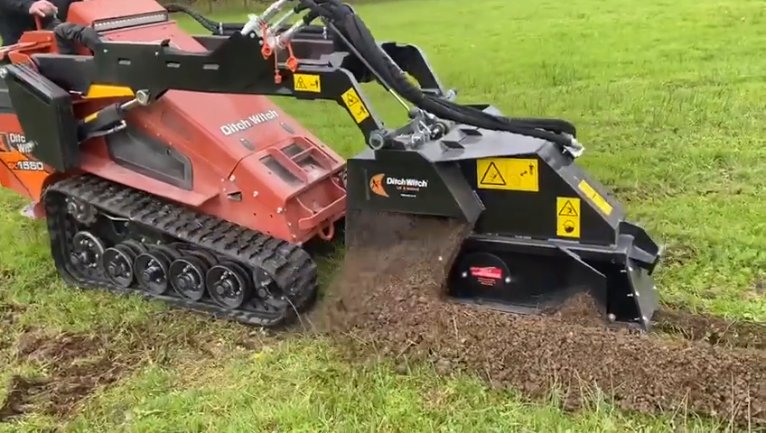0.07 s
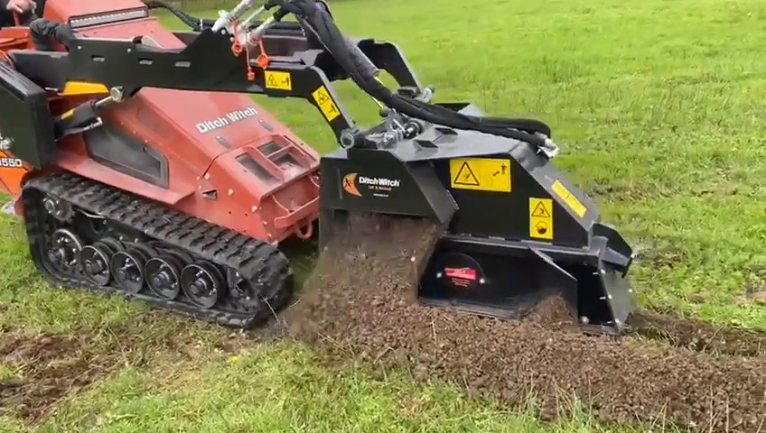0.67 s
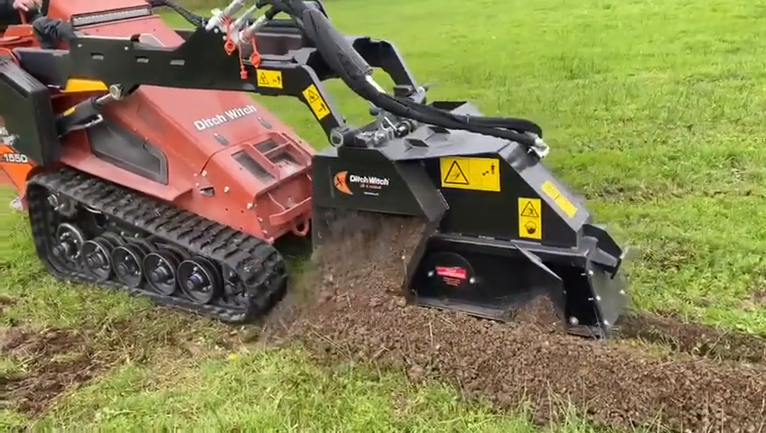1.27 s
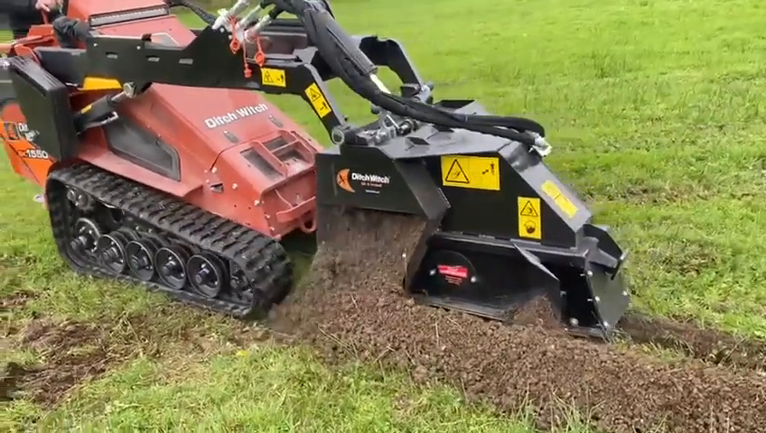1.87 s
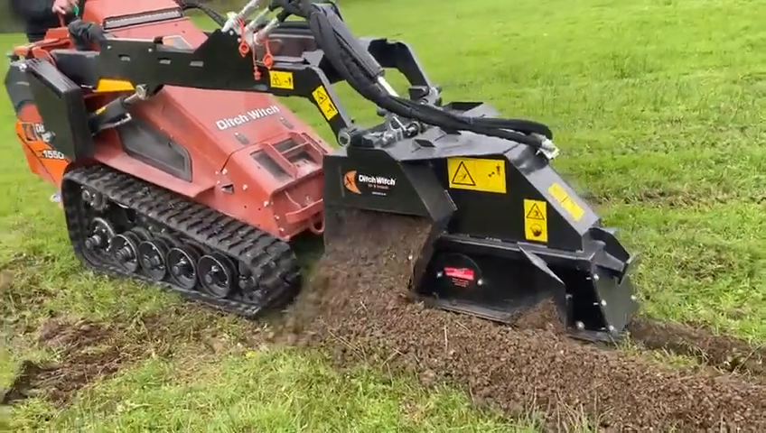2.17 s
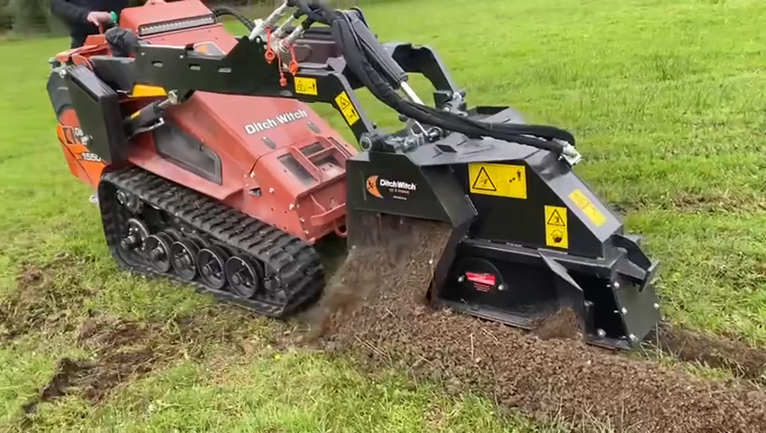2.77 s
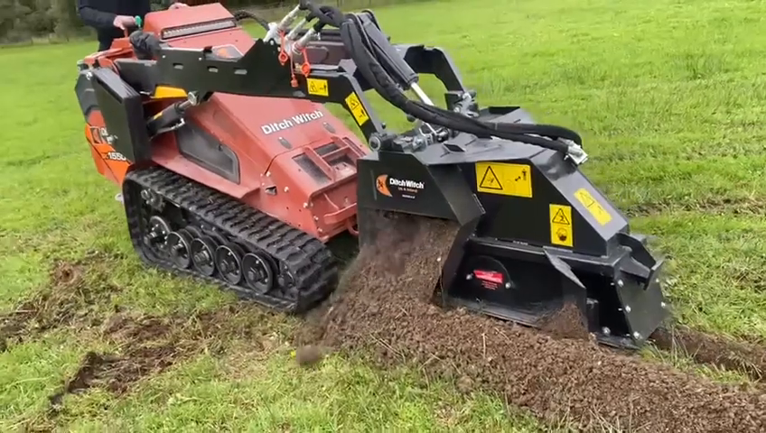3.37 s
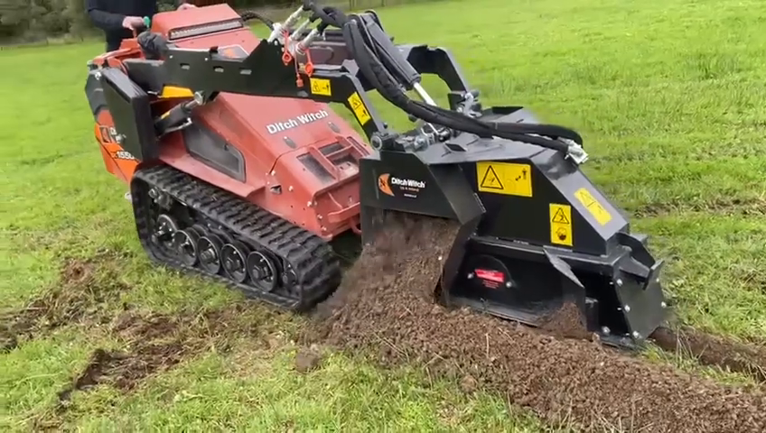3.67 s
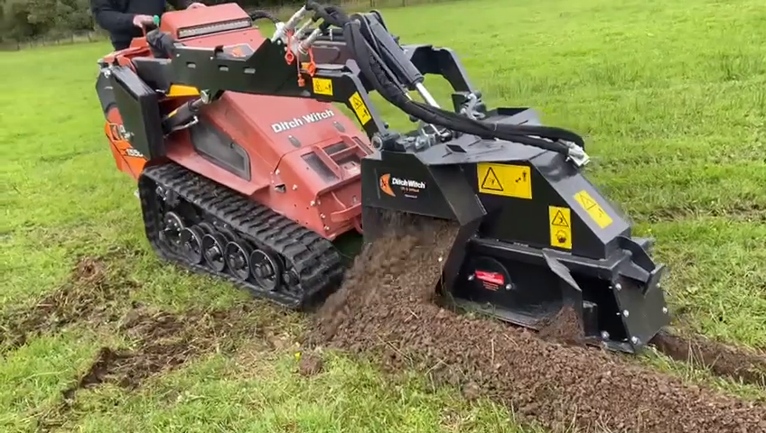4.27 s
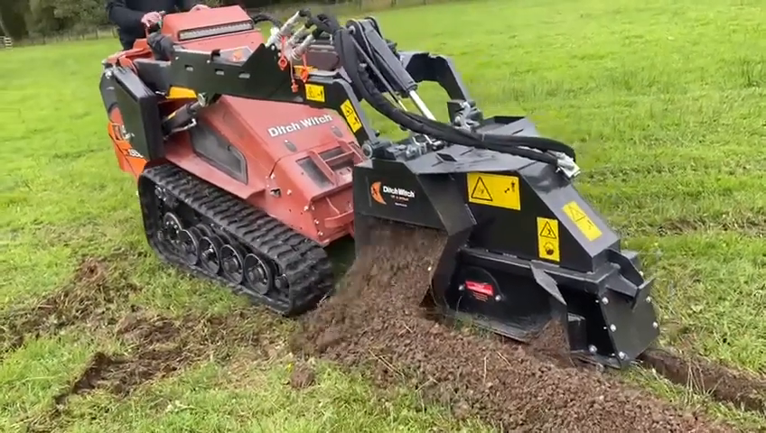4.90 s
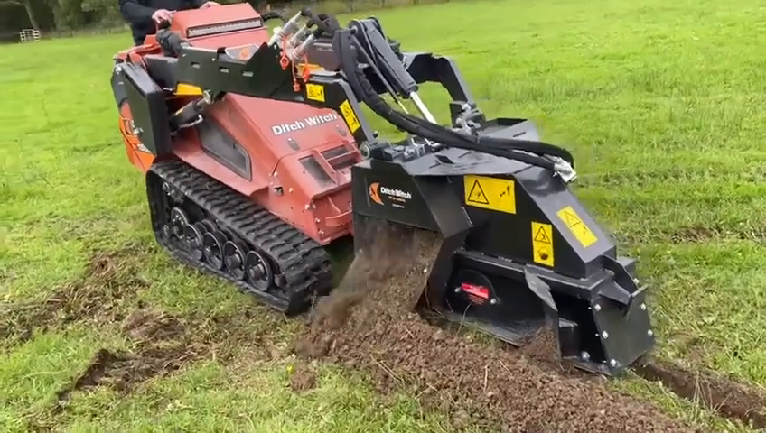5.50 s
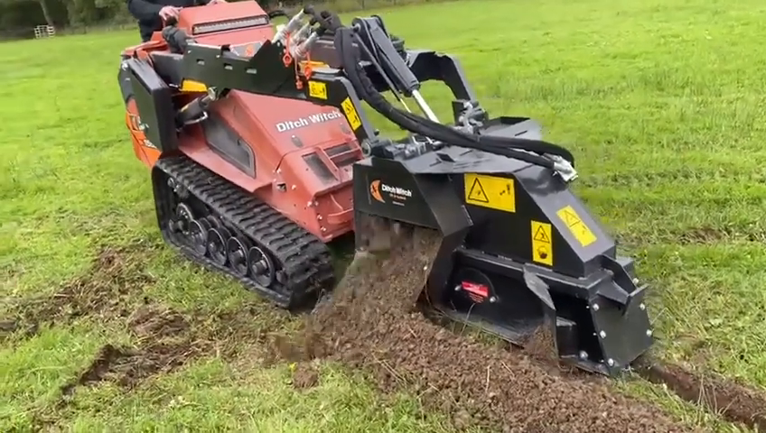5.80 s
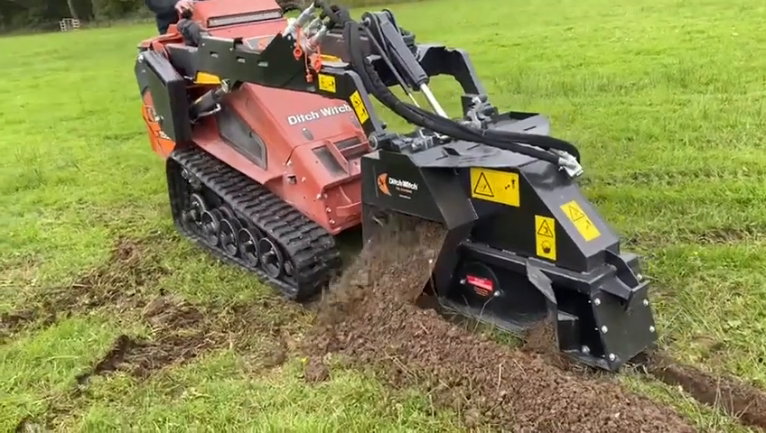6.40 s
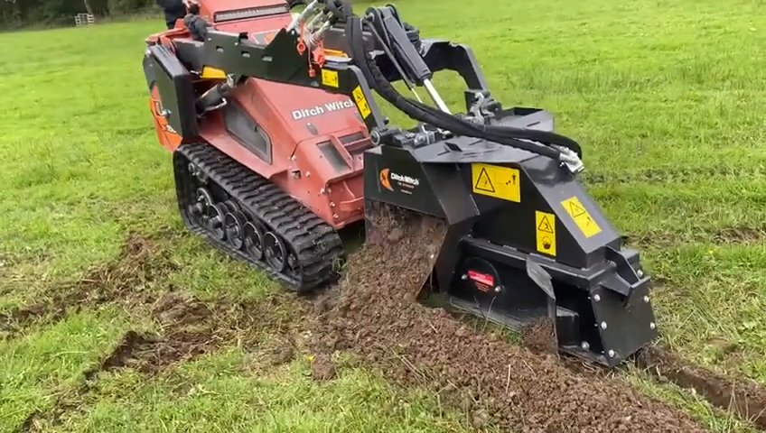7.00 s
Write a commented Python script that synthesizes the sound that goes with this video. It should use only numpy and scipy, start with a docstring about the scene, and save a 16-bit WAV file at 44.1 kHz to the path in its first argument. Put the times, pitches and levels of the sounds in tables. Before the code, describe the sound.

A small tracked diesel loader cuts a trench through turf, heard outdoors from a few metres away. It runs for the whole seven seconds: a strong, low fan hum on top of engine clatter, with a wavering mid-pitched hydraulic whine and a light oil hiss that gradually recedes. Underneath, the toothed wheel rumbles and churns earth, with a gritty spray of soil and a soft jingle of grit on steel. From the start, stones crack, knock and clank irregularly in the steel hood, several times a second, bunching a little near 3 seconds and easing around 4 to 4.7. From about 5 seconds the ground turns stonier and the rattle grows thicker and louder, with the heaviest knocks near 5.7 and 6.7 seconds. Meanwhile the engine hum sinks slightly in pitch and the hydraulic whine drops and strengthens under the strain, still running at the end.

```python
"""A small tracked diesel loader cuts a trench through turf, a few metres away.
The hum of its cooling fan sits on top of engine clatter and a hydraulic whine. The toothed wheel
rumbles underneath, churning earth and flinging soil and stones that crack, boom and clank in its
steel hood. After five seconds the ground turns stonier: the rattle thickens and the engine sags."""
import sys
import numpy as np
from scipy import signal
from scipy.fft import rfft, irfft
from scipy.io import wavfile
from scipy.ndimage import uniform_filter1d, map_coordinates

SR = 44100
rng = np.random.default_rng(int(sys.argv[2]) if len(sys.argv) > 2 else 0)


def file_out(sig):
    """Save sig as 16-bit WAV at sys.argv[1]."""
    # one column per channel
    cols = np.atleast_2d(sig).T
    # limit, then scale
    lim = np.clip(cols, -1, 1)
    pcm = np.round(lim * 32767).astype(np.int16)
    wavfile.write(sys.argv[1], SR, pcm)


N = 319725
T = np.arange(N) / SR
BINS = np.maximum(np.arange(N // 2 + 1) * SR / N, 1)

# fader ride on the fan's octave: time_s, level_db
FAN_OCTAVE_RIDE = [(0, -30.5), (.35, -28.5), (1.1, -31), (1.6, -31), (2, -32.5), (2.9, -31), (3.6, -34.5),
                   (5.2, -34), (7.25, -34)]
# fan overtones above the octave, engine running free: blade_rate_multiple, level_db
FAN_OVERTONES = [(3, -38), (4, -35.2)]
# fader ride on the thin whine high above the hum: time_s, level_db
FAN_WHINE_RIDE = [(0, -57), (.8, -53), (1.35, -44.5), (1.9, -47), (2.5, -48), (3, -52), (3.5, -50),
                  (4, -57), (4.7, -50), (5.3, -49), (5.8, -57), (7.25, -58)]
# tone colour of the engine block: frequency_hz, gain_db
BLOCK_EQ = [(60, -33), (220, 6.5), (500, -3), (700, 12.5), (1200, 4), (1850, 6.5), (2400, -11), (3000, -10),
            (4700, -4), (5700, -6), (7400, -11), (10800, -19), (12000, -26)]
# strong engine tones: crank_rate_multiple, level_db
ENGINE_ORDERS = [(2, -37), (3, -36.5), (12, -42.5), (22, -48), (25, -46), (28.5, -47), (37, -47),
                 (46.5, -52), (60, -57.5)]
# whine of the hydraulic motor: time_s, pitch_hz
MOTOR_PITCH = [(0, 617), (1.0, 621), (1.4, 648), (1.9, 648), (2.6, 632), (4.2, 612), (5.05, 611),
               (6.25, 581), (7.25, 556)]
# bands of oil hiss in the valves: centre_hz, width_hz, gain_db
VALVE_BANDS = [(3100, 300, -2), (4200, 450, 0), (4850, 300, -2), (6600, 350, -3), (7400, 350, -3),
               (10700, 700, -6)]
# how hard the wheel is pushed into the earth: time_s, feed_0_to_1
WHEEL_FEED = [(0, .35), (.6, .25), (1.3, .76), (1.8, .65), (2.3, .1), (2.8, .98), (3.2, .7), (3.55, .3),
              (4.7, 0), (5.05, .3), (5.35, .85), (6.7, .7), (7.25, .15)]
# how stony the ground is: time_s, stoniness_0_to_1
STONINESS = [(0, 0.14), (1.1, 0.24), (2.3, 0.34), (2.8, 0.5), (3.4, 0.23), (4.7, 0), (5.2, .6), (5.75, 1),
             (6.15, .63), (6.7, 0.47), (7.25, 0.18)]
# low resonances of wheel and frame: pitch_hz, width_hz, gain_db
FRAME_MODES = [(80.4, 6.6, 0), (96, 25, -5), (142.7, 11.5, -7.5), (176.2, 27, -4.5)]
# tone colour of churned earth: frequency_hz, gain_db
CHURN_EQ = [(20, -21), (45, -15), (110, -7.5), (230, 0), (330, -2.5), (480, -4), (540, -4.5), (630, -1.5),
            (740, -4), (1000, -9.5), (1500, -11), (2200, -17), (3000, -19), (8000, -39)]
# resonances of the steel hood: pitch_hz, width_hz, gain_db
HOOD_MODES = [(710, 170, -5.5), (940, 140, -3), (1157, 160, -4.5), (1540, 55, -12.5), (2080, 140, -13.5)]
# tone colour of the soil spray: frequency_hz, gain_db
SPRAY_EQ = [(400, -20), (1200, -1), (2200, 1.5), (2900, -1.5), (4000, 0.3), (4800, .3), (5600, -4),
            (7400, 0), (8200, -1.5), (10800, -2), (12000, -7)]
# ring of the steel teeth: pitch_hz, width_hz, gain_db
TOOTH_MODES = [(1570, 70, -2), (1760, 70, -1), (1880, 60, -2), (2340, 45, 1), (2490, 55, 0)]
# fader ride on the grit clinking on the teeth: time_s, level_db
CLINK_RIDE = [(0, -41.5), (.75, -43), (1.05, -49), (1.6, -43), (2.3, -44), (2.9, -41.5), (3.8, -39.5),
              (4.4, -44), (5.6, -41), (6.7, -40), (7.25, -38.5)]
# big stones hitting the hood, levels before the mix trims: start_s, crack_db, boom_db, plate_hz, clank_db
STONE_HITS = [(.020, -24, -31, 6100, -31), (.206, -20.5, -30, 7300, -25), (.264, -21.5, -34, 2200, -28),
              (.292, -24, -26, 2400, -26), (.707, -26, -25, 2400, -28), (.771, -26, -30, 2400, -28),
              (1.197, -23, -28, 7300, -27), (1.408, -24, -36, 7300, -28), (1.602, -23, -22, 4200, -30),
              (1.654, -22.5, -34, 2350, -25), (1.841, -22, -21, 7300, -29), (1.968, -26, -30, 2400, -29),
              (2.093, -25, -28, 2300, -24), (2.336, -22.5, -26, 2370, -23), (2.342, -28, -26, 3700, -27),
              (2.496, -25.5, -20, 1550, -25), (2.582, -22.5, -23, 7300, -29), (2.643, -25, -25, 4500, -27),
              (2.823, -23, -34, 2370, -20), (2.860, -26, -26, 2330, -20), (2.884, -21, -30, 7190, -26),
              (2.985, -27, -26, 3960, -26), (3.069, -26, -34, 4500, -27), (3.106, -25, -28, 2100, -21),
              (3.230, -27, -26, 2200, -25), (3.714, -26, -26, 2370, -26), (3.839, -28, -27, 2370, -24),
              (3.901, -22, -24, 2500, -27), (4.038, -22.5, -24, 4700, -29), (4.318, -31, -24, 2450, -27),
              (4.564, -25, -20.5, 2370, -24), (4.625, -29, -23, 2450, -26), (4.814, -23.5, -32, 5000, -28),
              (4.872, -21.5, -24, 5000, -26), (5.056, -23, -33, 2020, -21), (5.120, -16, -32, 6100, -22),
              (5.137, -25, -35, 2330, -22), (5.180, -25, -22, 2330, -21), (5.204, -21, -22, 4600, -27),
              (5.311, -21.5, -26, 4700, -28), (5.377, -18.5, -19, 2280, -21),
              (5.452, -23.5, -22, 2200, -22), (5.501, -21.5, -22, 2070, -20), (5.587, -26, -22, 1550, -25),
              (5.630, -18.5, -28, 3920, -23), (5.714, -27, -16.5, 800, -18), (5.738, -21.5, -16, 4570, -19),
              (5.746, -28, -24, 2200, -18), (5.770, -21, -15.5, 950, -16), (5.899, -22, -21, 2330, -20),
              (5.932, -19, -25, 6110, -25), (5.985, -21.5, -24, 2300, -23), (6.033, -20, -21, 3790, -21),
              (6.119, -21.5, -33, 2970, -18.5), (6.162, -18.5, -18.5, 2200, -22),
              (6.196, -21.5, -34, 2200, -19), (6.289, -20.5, -32, 4130, -21), (6.420, -25, -30, 2300, -26),
              (6.550, -19.5, -20, 2110, -17), (6.688, -17.5, -20.5, 4180, -22),
              (6.709, -15.5, -30, 7500, -22), (6.722, -18, -25, 4600, -16), (6.727, -26, -30, 2200, -16),
              (6.793, -25, -36, 2300, -24), (6.824, -23, -30, 7300, -27), (6.959, -30, -19, 2200, -25),
              (6.999, -23.5, -36, 2400, -24), (7.066, -22.5, -32, 4570, -28), (7.091, -20, -24, 2200, -21),
              (7.225, -24, -22, 2400, -26)]
# tone colour of stone knocks: frequency_hz, gain_db
KNOCK_EQ = [(500, -10), (1500, 0), (2300, 1.5), (3100, -2), (4300, -.5), (5800, -4.5), (7500, -4),
            (12000, -11)]
# ring of the wheel when a stone hits: pitch_hz, width_hz, gain_db
WHEEL_RING_MODES = [(1850, 70, 0), (2140, 60, 2), (2420, 60, 1), (4180, 110, -7), (4570, 80, -5),
                    (6080, 110, -7), (7280, 110, -6), (7720, 90, -7)]
# partials of a struck plate: pitch_ratio, gain_db
PLATE_PARTIALS = [(.66, -7), (.83, -4), (1, 0), (1.72, -7), (2.5, -12)]
# swelling oil whistles: peak_s, half_length_s, peak_db, faint_pitch_hz, rise_hz
OIL_WHISTLES = [(.23, .06, -51, 10830, 35), (.6, .05, -53, 10830, 35), (4.6, .3, -59, 4790, 60),
                (5.1, .4, -52.5, 4900, 140), (6.3, .22, -49, 3170, 110)]
# stereo image, 1 the same in both ears and -1 opposed: frequency_hz, correlation
EAR_LIKENESS = [(200, .985), (450, .95), (800, .9), (1400, .84), (2200, .56), (3200, .33), (4900, .72),
                (5400, .45), (6200, .92), (7500, .92), (8400, -.9), (9600, -.9), (10300, .92)]
# stereo balance: frequency_hz, left_minus_right_db
EAR_BALANCE = [(60, -0.5), (220, -1), (390, 0), (470, 4), (580, -7.5), (800, -3), (1000, -4.5), (1400, -2),
               (1800, -3.5), (2400, -1.5), (3000, 4.5), (4000, 1.2), (7000, 0.5)]

FREE_BLADE_HZ, BLADES_PER_CRANK_TURN = 196.7, 3.9375
BOG_S, SAG_HZ_PER_S = 5.23, 5.6  # when the engine bogs; how fast the fan's pitch sinks
SHIFT_S = 4.7  # over this time the balance shifts: the hum grows and the valve hiss falls back
# Each pair: base value, then the change once the balance has shifted or at full strain, feed or stoniness.
HUM_DB, HUM_SHIFT_DB = -21, 2
MOTOR_DB, MOTOR_STRAIN_DB = -43, 12.5
HISS_DB, HISS_SHIFT_DB = -43, -9
RUMBLE_DB, RUMBLE_FEED_DB = -29, 6
CHURN_DB, CHURN_STONY_DB = -27.5, 3.5
CLOD_DB, CLOD_STONY_DB = -10.5, 3  # relative to the churn
SPRAY_DB, SPRAY_STONY_DB = -44, 7
PEBBLES_PER_S, PEBBLES_STONY_PER_S = 10, 40
PEBBLE_DB, PEBBLE_STONY_DB = -35, 8.5  # before the mix trims


def undb(db):
    """Decibels to gain."""
    return 10 ** (np.asarray(db) / 20)


def unit(x):
    """Scale to rms 1."""
    return x / np.sqrt(np.mean(x ** 2))


def ride(points):
    """An automation lane: straight lines between (time_s, value) points."""
    return np.interp(T, *np.transpose(points))


def across(points):
    """Draw (frequency_hz, value) points across every frequency bin."""
    hz, value = np.transpose(points)
    return np.interp(np.log(BINS), np.log(hz), value)


def colour(x, eq):
    """Shape a sound with an EQ curve."""
    return irfft(rfft(x) * undb(across(eq)), N)


def resonate(x, modes):
    """Pass a sound through a bank of steep resonances."""
    power = 0
    for hz, width, db in modes:
        detune = (BINS ** 2 - hz ** 2) / (BINS * width * 2)
        power += undb(db) ** 2 / (1 + detune ** 2) ** 2
    return irfft(rfft(x) * np.sqrt(power), N)


def strike(blows, modes):
    """Blows ring decaying steel modes, each blow in a different mix; two channels."""
    age = T[:SR // 10]
    out = np.zeros((2, N))
    for hz, width, db in modes:
        mode = undb(db) * np.sqrt(width) * np.sin(2 * np.pi * hz * age) * np.exp(-np.pi * width * age)
        out += signal.fftconvolve(blows * rng.uniform(-.93, 1, (2, N)), mode[None], axes=1)[:, :N]
    return out


def drift(rate_hz):
    """Smooth random modulation of rms 1, moving at up to about rate_hz."""
    return unit(irfft(rfft(rng.standard_normal(N)) / (1 + (BINS / rate_hz) ** 4), N))


def turns(hz):
    """Cycles completed at a changing rate."""
    return np.cumsum(hz) / SR


def tone(cycles):
    """A sine of rms 1 that starts anywhere in its cycle."""
    return np.sqrt(2) * np.sin(2 * np.pi * (cycles + rng.random()))


def spread(pair):
    """Two unrelated signals become left and right, nearly mono in the bass."""
    likeness = np.clip(across(EAR_LIKENESS), -1, 1)
    mid, side = rfft(pair) * np.sqrt([1 + likeness, 1 - likeness])
    return irfft(np.array([mid + side, mid - side]), N)


def grains(per_s, scatter_db):
    """Tiny random impacts of scattered size; two channels."""
    size = undb(scatter_db * np.clip(rng.standard_normal(N), -2, 2))
    struck = rng.random(N) < per_s / SR
    return size * struck * rng.standard_normal((2, N))


def fan(blade_hz, load, shifted):
    """Blades chop the air: a strong hum whose overtones waver with the inflow and fade as it slows."""
    blade = turns(blade_hz)
    hum = undb(HUM_DB + HUM_SHIFT_DB * shifted + .19 * drift(6.6)) * tone(blade + .0038 * drift(11))
    octave = undb(ride(FAN_OCTAVE_RIDE) + .7 * drift(7)) * tone(2 * blade + .012 * drift(7))
    upper = sum(undb(db + 1.9 * drift(7)) * tone(k * blade + .04 * drift(6)) for k, db in FAN_OVERTONES)
    ear_cycles = np.array([[-.15], [.15]])  # the thin whine reaches the left ear later
    whine = undb(ride(FAN_WHINE_RIDE) + 1.8 * drift(7)) * tone(16 * blade + .1 * drift(6) + ear_cycles)
    return hum + octave + undb(-6 * load) * upper + whine


def engine(crank_hz):
    """Four-cylinder diesel: the same clatter comes round every two turns, swelling at each firing."""
    crank = turns(crank_hz)
    loop = rng.standard_normal((2, 1764))
    playhead = (crank / 2 % 1) * loop.shape[1] + 1.3 * drift(30)
    clatter = np.array([map_coordinates(side, [playhead], order=3, mode="grid-wrap") for side in loop])
    firing = 1 + .15 * np.exp(-(2 * crank % 1) / .86)
    block = unit(colour(spread(clatter * firing * undb(2.44 * drift(22))), BLOCK_EQ))
    drone = sum(undb(db + 1.75 * drift(3.5)) * tone(k * crank + .098 * drift(1.87))
                for k, db in ENGINE_ORDERS)
    return undb(-33.5) * block + drone


def pump(crank_hz, load):
    """The nine-piston pump sings at twice its piston rate, louder under load."""
    return undb(-41.5 + 6.5 * load + 1.8 * drift(6)) * tone(18 * turns(crank_hz))


def hydraulic_motor(free_hz=652.3, full_strain_drop_hz=45.7, shake_db=4.5, shake_hz=9):
    """The motor's whine drops, grows and steadies as it is held back and oil pressure builds."""
    pitch_hz = ride(MOTOR_PITCH)
    strain = np.clip((free_hz - pitch_hz) / full_strain_drop_hz, 0, 1)
    shake = 1 - .62 * strain
    level_db = MOTOR_DB + MOTOR_STRAIN_DB * strain + shake_db * shake * drift(28) + drift(2)
    return undb(level_db) * tone(turns(pitch_hz + shake_hz * shake * drift(25)))


def valve_hiss(shifted):
    """Oil hisses through the valves, falling back in the mix as the balance shifts."""
    hiss = unit(resonate(spread(rng.standard_normal((2, N))), VALVE_BANDS))
    return undb(HISS_DB + HISS_SHIFT_DB * shifted ** 2) * hiss


def cutter_wheel(crank_hz, stony):
    """Over the frame's rumble, teeth bite about thirty times a second, throwing crumbs and clods."""
    tooth = turns(crank_hz * .61)
    # some of the eight teeth dig deeper on every turn; each bite also differs by chance
    depth_db = 1.3 * np.resize(rng.standard_normal(8), 512)
    depth_db += 2.5 * np.clip(rng.standard_normal(512), -2, 1.2)
    bite = undb(depth_db[tooth.astype(int)]) * np.exp(-(tooth % 1) / .5)
    bite = uniform_filter1d(bite, size=260)  # soft earth gives way over some milliseconds
    rumble = unit(resonate(spread(rng.standard_normal((2, N))), FRAME_MODES))
    churn = unit(colour(spread(grains(8000, 1.8) * (1 + .052 * bite)), CHURN_EQ))
    clods = unit(resonate(spread(grains(1100, 1) * (.8 + bite)), HOOD_MODES))
    spray = unit(colour(spread(grains(12000, 2) * (1 + 1.7 * bite)), SPRAY_EQ))
    earth = churn + undb(CLOD_DB + CLOD_STONY_DB * stony) * clods
    return (undb(RUMBLE_DB + RUMBLE_FEED_DB * ride(WHEEL_FEED)) * rumble
            + undb(CHURN_DB + CHURN_STONY_DB * stony) * earth
            + undb(SPRAY_DB + SPRAY_STONY_DB * stony) * spray)


def grit_clinks(per_s=60):
    """Grit strikes the steel teeth so often that the rings merge into a soft jingle."""
    blows = rng.random(N) < per_s / SR
    return undb(ride(CLINK_RIDE)) * unit(spread(strike(blows, TOOTH_MODES)))


def pebble_hits(stony, centre_hz=2275):
    """Pebbles land at random, more and harder in stony ground: rows like those of STONE_HITS."""
    struck = rng.random(N) < (PEBBLES_PER_S + PEBBLES_STONY_PER_S * stony) / SR
    levels_db = PEBBLE_DB + PEBBLE_STONY_DB * stony + rng.standard_normal((3, N))
    crack_db, boom_db, clank_db = levels_db[:, struck]
    plate_hz = centre_hz * (1 + .104 * rng.standard_normal(N)[struck])  # differs from spot to spot
    return list(zip(T[struck], crack_db, boom_db, plate_hz, clank_db))


def stones(stony, attack_s=.0045, decay_s=.0115, rattle_trim_db=-5.2, boom_trim_db=1.3,
           clank_trim_db=-3.7):
    """Each stone is a short burst of knocks that booms the hood, rings the wheel and clanks a plate."""
    crack_power, boom_power, clanks = np.zeros(N), np.zeros(N), np.zeros((2, N))
    knocks = spread(grains(9000, 1.2))
    for start_s, crack_db, boom_db, plate_hz, clank_db in list(STONE_HITS) + pebble_hits(stony):
        start = max(int((start_s - attack_s / 2) * SR), 0)
        age = T[:min(SR // 10, N - start)]
        span = slice(start, start + len(age))
        burst = (1 - np.exp(-age / attack_s)) * np.exp(-age / decay_s)
        crack_power[span] += (undb(crack_db) * burst) ** 2
        boom_power[span] += (undb(boom_db) * burst) ** 2
        clanks[:, span] += undb(clank_db) * plate_clank(burst, plate_hz)
    rattle = undb(rattle_trim_db) * unit(colour(knocks, KNOCK_EQ)) * np.sqrt(crack_power)
    boom = undb(boom_trim_db) * unit(resonate(knocks, HOOD_MODES)) * np.sqrt(boom_power)
    wheel_ring = unit(spread(strike(np.sqrt(crack_power), WHEEL_RING_MODES)))
    wheel_ring *= undb(-3) * np.std(rattle)  # tucked just under the rattle
    return rattle + boom + wheel_ring + undb(clank_trim_db) * spread(clanks)


def plate_clank(burst, pitch_hz, decay_cycles=10):
    """A struck plate rings at its own pitch; soil damps it quickly, and high partials die first."""
    length = len(burst)
    cycles = pitch_hz * T[:length]
    plate = sum(undb(db) * np.sin(2 * np.pi * ratio * cycles) * np.exp(-ratio * cycles / decay_cycles)
                for ratio, db in PLATE_PARTIALS)
    contact = rng.standard_normal((2, length)) * burst
    clank = signal.fftconvolve(contact, plate[None], axes=1)[:, :length]
    return clank / (np.abs(clank).max(axis=1, keepdims=True) + 1e-18)


def oil_whistles():
    """Oil whistles through the valves, bending up in pitch as each whistle swells."""
    out = np.zeros(N)
    for peak_s, half_length_s, peak_db, faint_hz, rise_hz in OIL_WHISTLES:
        swell = np.exp(-((T - peak_s) / half_length_s) ** 2 / 2)
        gain = swell * undb(peak_db + 2.5 * drift(14))
        out += gain * tone(turns(faint_hz + rise_hz * swell + 18 * drift(30)))
    return out


def scene():
    """The governor holds speed until stony ground bogs the engine at BOG_S; fan, pump and wheel sag too."""
    blade_hz = FREE_BLADE_HZ - SAG_HZ_PER_S * np.maximum(T - BOG_S, 0)
    crank_hz = blade_hz / BLADES_PER_CRANK_TURN
    load = (FREE_BLADE_HZ - blade_hz) / (FREE_BLADE_HZ - blade_hz.min())
    shifted = np.minimum(T / SHIFT_S, 1)
    stony = ride(STONINESS)
    machine = fan(blade_hz, load, shifted) + engine(crank_hz)
    hydraulics = pump(crank_hz, load) + hydraulic_motor() + valve_hiss(shifted) + oil_whistles()
    digging = cutter_wheel(crank_hz, stony) + grit_clinks() + stones(stony)
    return machine + hydraulics + digging


def record(dry):
    """The midrange leans to the right, and a steep low-pass takes off the top."""
    tilt_db = np.array([[.5], [-.5]]) * across(EAR_BALANCE)
    panned = irfft(rfft(dry) * undb(tilt_db), N)
    return signal.sosfilt(signal.ellip(8, .2, 70, 11600, fs=SR, output="sos"), panned)


dry = scene()
out = record(dry)
file_out(out)
```